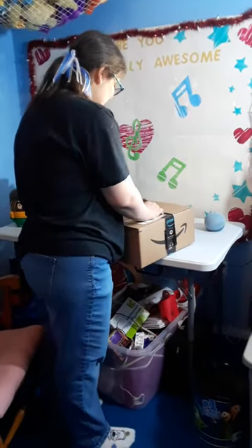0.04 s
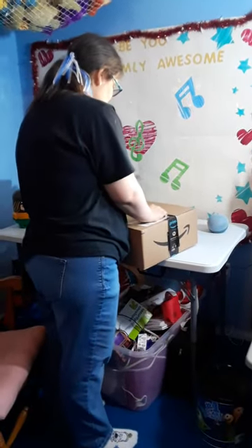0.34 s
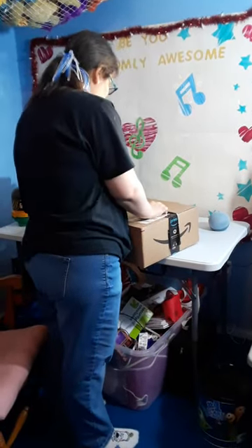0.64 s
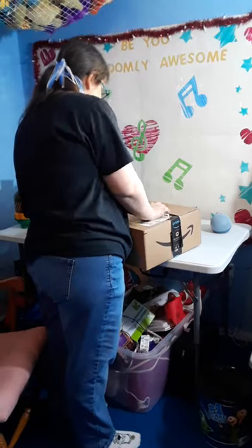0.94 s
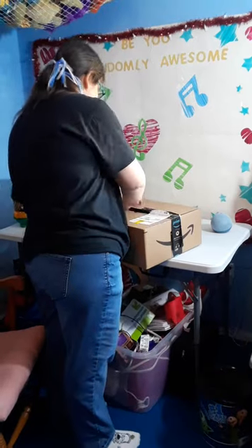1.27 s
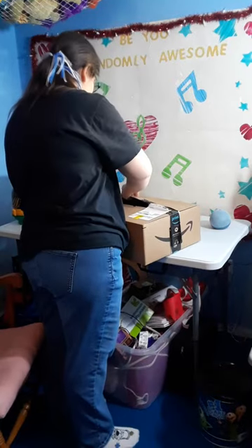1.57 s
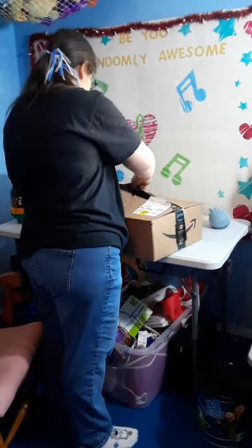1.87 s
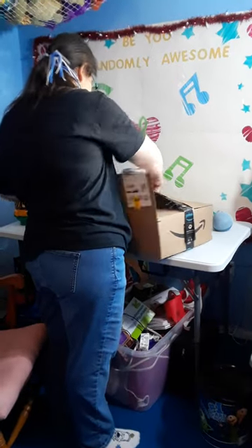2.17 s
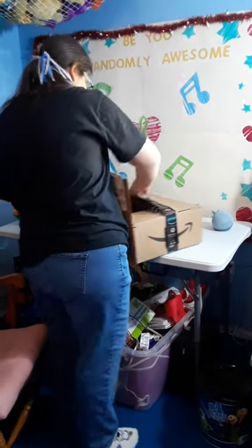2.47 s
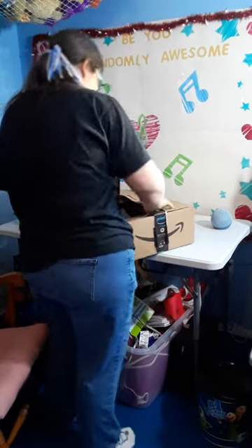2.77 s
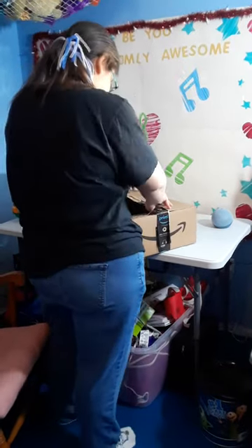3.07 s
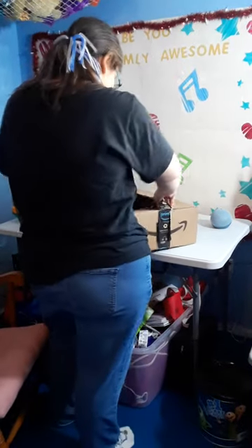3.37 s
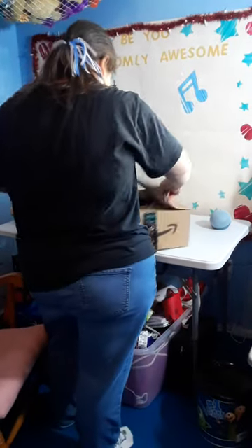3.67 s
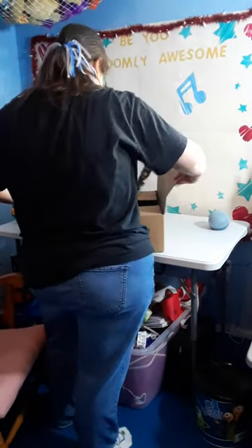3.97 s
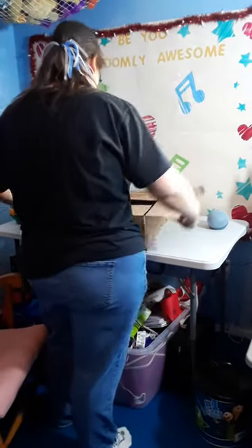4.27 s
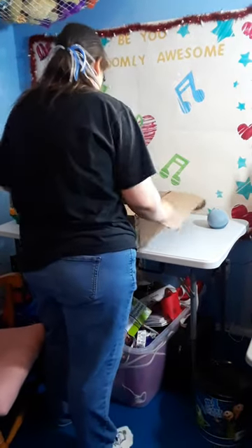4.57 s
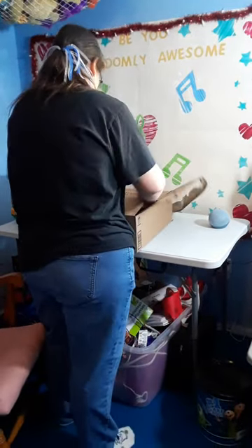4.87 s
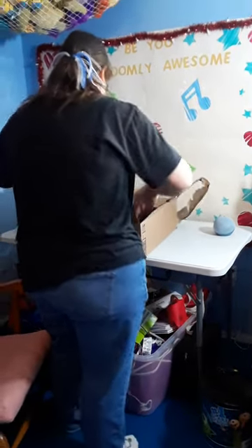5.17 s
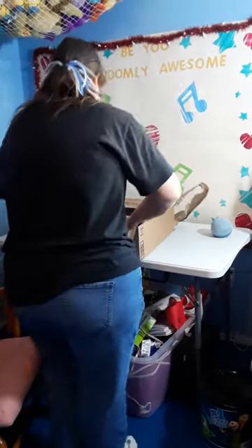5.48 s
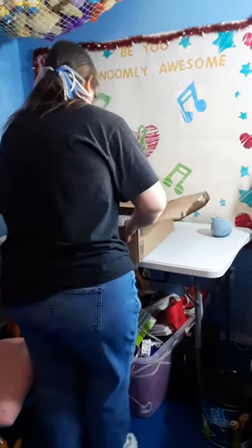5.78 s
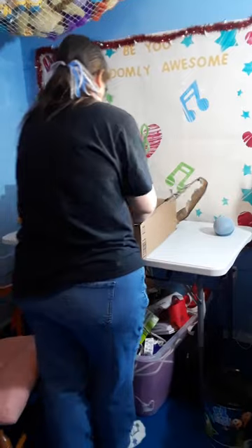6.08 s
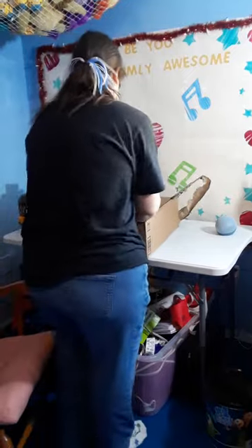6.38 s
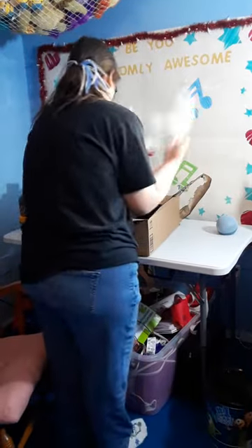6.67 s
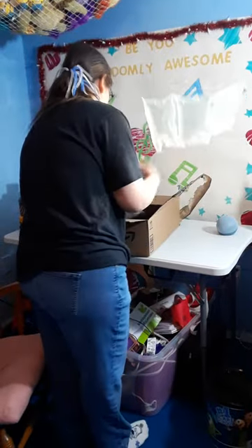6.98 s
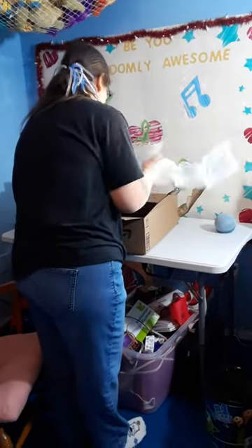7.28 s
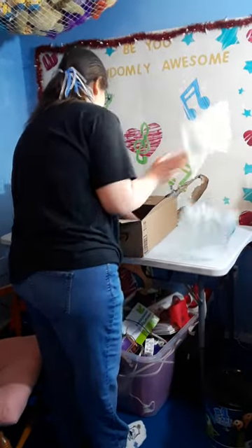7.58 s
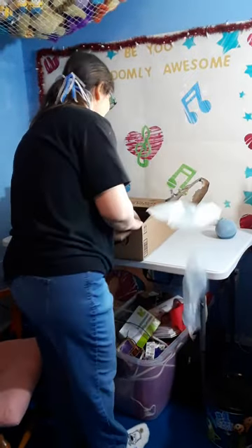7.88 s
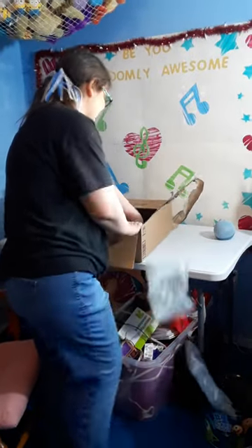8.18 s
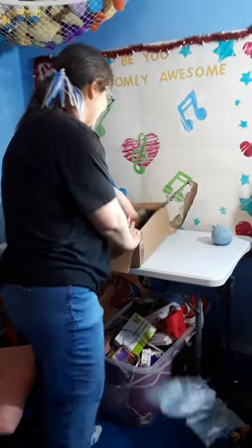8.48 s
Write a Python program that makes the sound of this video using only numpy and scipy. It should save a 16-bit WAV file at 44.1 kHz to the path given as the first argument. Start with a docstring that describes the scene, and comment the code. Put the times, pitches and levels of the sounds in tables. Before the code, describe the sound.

A cardboard box is opened by hand on a table, a few steps from the microphone in a small room. For the first second, packing tape rips off in a raspy chatter of snaps. From about 1 second the flaps scrape and rub unevenly. Sharp cracks, hollow knocks and dull bumps come between 1.6 and 2.2 seconds as the cardboard gives way, and a second loud cluster follows from 3.3 to 3.7 seconds. Softer scraping, small snaps and light bumps continue until about 6 seconds. Then plastic air pillows are dragged out and tossed aside, crinkling in irregular bursts, strongest around 6.3 and 7.2 seconds. The box knocks on the table near 7.9 seconds, and a last bump at 8.5 seconds leaves a brief low rumble. Each sound has a short room reverberation, over a faint steady hush.

```python
"""A cardboard box is opened on a folding table in a small room, a few steps from a two-port microphone.
First packing tape is ripped off, its glue yielding in a chatter of snaps. From 1 s the flaps scrape by
stick-slip friction and burst free in cracks, while knocks and bumps excite the modes of box and table.
From 6 s plastic air pillows are dragged out, crinkling, and tossed aside; a last bump at 8.5 s leaves
a low rumble. Short reverberation follows every sound, over a faint steady hush."""
import sys
import numpy as np
from scipy import signal
from scipy.fft import rfft, irfft, next_fast_len
from scipy.io import wavfile
from scipy.ndimage import uniform_filter1d

SR = 44100
rng = np.random.default_rng(int(sys.argv[2]) if len(sys.argv) > 2 else 0)


def generate_wav(sig):
    """Save sig (samples, or channels by samples) to the path in sys.argv[1] as 16-bit PCM at SR."""
    pcm = np.round(np.clip(np.atleast_2d(sig).T, -1, 1) * 32767).astype(np.int16)
    wavfile.write(sys.argv[1], SR, pcm)


N = 380583
TIME = np.arange(N) / SR
TAPS = 8192
HZ = np.fft.rfftfreq(TAPS, 1 / SR)


def amp(db):
    """Amplitude ratio of a level in decibels."""
    return 10 ** (np.asarray(db) / 20)


def unit(x):
    """Normalisation to an rms of 1."""
    return x / np.sqrt(np.mean(x ** 2) + 1e-20)


def curve(points, hz, column=1):
    """Linear interpolation of a table column over log frequency."""
    points = np.array(points)
    return np.interp(np.log(hz + 1), np.log(points[:, 0] + 1), points[:, column])


def add(mix, start_s, sound):
    """Superposition of a sound on the mix."""
    part = mix[max(0, round(start_s * SR)):][:len(sound)]
    part += sound[:len(part)]


def tint(x, gain_db):
    """Minimum-phase filter with a gain given on the HZ grid: it rings after a click, never before."""
    log_gain = np.log(amp(np.maximum(gain_db, -100)))
    mirrored = np.concatenate([log_gain, log_gain[-2:0:-1]])
    response = np.fft.ifft(np.exp(np.conj(signal.hilbert(mirrored)))).real[:TAPS // 2]
    return signal.oaconvolve(x, response)[:len(x)]


def resonance(hz, octaves):
    """Lorentzian peak of height 1 over log frequency; octaves is its half width."""
    return 1 / (1 + (np.log2((HZ + 1) / hz) / octaves) ** 2)


def band_shares(hz):
    """Complementary crossover: mid band, drumming below 700 Hz and fizz above 3.5 kHz sum to 1."""
    low = 1 / (1 + (hz / 700) ** 6)
    high = 1 - 1 / (1 + (hz / 3500) ** 8)
    return np.array([1 - low - high, low, high])


# The two ports: (frequency [Hz], left over right [dB], coherence [0-1], left phase lead [rad])
PORT_RELATIONS = [(120, -.3, .98, .05), (300, -1.8, .95, .1), (430, -7.3, .78, .5), (530, -2.8, .2, .8),
                  (650, 4.1, .25, 1.6), (780, 3.4, .4, .2), (920, 1.2, .65, .2), (1100, -3.6, .3, 2.4),
                  (1900, -1.6, .15, 1.6), (2800, -5.8, .3, 1.3), (4200, 1, .1, 0), (6300, .2, .03, 0),
                  (8800, 10, .01, 0), (13000, 5.7, 0, 0), (16000, 8, 0, 0)]
def ports(pair):
    """Partial coherence: two independent signals become alike in the bass and stay apart in the treble."""
    size = next_fast_len(pair.shape[1] + TAPS, True)
    hz = np.fft.rfftfreq(size, 1 / SR)
    left, other = rfft(pair, size)
    coherence = np.clip(curve(PORT_RELATIONS, hz, column=2), 0, .995)
    lag = np.exp(-1j * curve(PORT_RELATIONS, hz, column=3))
    right = (coherence * left + np.sqrt(1 - coherence ** 2) * other) * lag
    lean = amp(curve(PORT_RELATIONS, hz) / 2)
    return irfft(np.array([left * lean, right / lean]), size)[:, :pair.shape[1]]


# Spectrum of the room's hush: (frequency [Hz], level [dB])
HUSH_SPECTRUM = [(18, -65), (30, -39), (127, 8), (404, -1), (569, 4.5), (3060, 0), (4300, -10),
                 (7670, -11.5), (9460, -31), (13000, -17), (16000, -29)]
def hush(level_db=-50.5):
    """Stationary coloured noise forms the ambient floor of the room."""
    pair = np.array([tint(side, curve(HUSH_SPECTRUM, HZ)) for side in rng.standard_normal((2, N))])
    return amp(level_db) * unit(ports(pair))


# Reverberation time of the room: (frequency [Hz], time to fall by 60 dB [s])
ROOM_T60 = [(120, 0.62), (320, 0.19), (840, 0.34), (2200, 0.36), (6000, 0.34), (15000, 0.31)]
def room(x, direct=0.35, early=2.28, early_s=0.015, echoes_per_s=3500):
    """Convolution with direct sound, early reflections from near wall and table, and a short tail."""
    size, lead = 2 * TAPS, 48
    t = TIME[:size]
    echoes = rng.standard_normal((2, size)) * (rng.random((2, size)) < echoes_per_s / SR) * (t > .001)
    hz, age, spectra = signal.stft(echoes * (1 + early * np.exp(-t / early_s)), SR, nperseg=256)
    decay = amp(-60 * age / curve(ROOM_T60, hz)[:, None])
    tail = signal.istft(spectra * decay, SR)[1][:, :size]
    response = np.pad(tail / np.linalg.norm(tail, axis=1, keepdims=True), ((0, 0), (lead, 0)))
    response[[0, 1], [lead, lead + 19]] += direct  # reaches the left port first
    response = ports(response)
    # the room spreads the sound in time but keeps its broad colour
    power = abs(rfft(response.mean(0), 4 * TAPS)) ** 2
    colour_db = 10 * np.log10(uniform_filter1d(power, 60)[::4] + 1e-9)
    return np.array([signal.oaconvolve(x, tint(side, -colour_db))[lead:lead + N] for side in response])


def moving_paths(x, count=4, cycle_s=.13):
    """Multipath propagation: as hands and flaps move, the sound crossfades between paths in the room."""
    turn = TIME / cycle_s * count
    distances = [abs((turn - k) % count - count / 2) for k in range(count)]
    shares = [np.cos(np.pi / 2 * np.minimum(distance, 1)) for distance in distances]
    return amp(-1.55) * sum(room(x * share) for share in shares)


# Modes of the box on its table: (frequency [Hz], bandwidth [Hz], lift [dB])
BOX_MODES = [(79, 21, 8.5), (141.5, 21, 10), (209.7, 17, 5.5), (316, 47, 6), (412.5, 53, 6.5),
             (534, 27, 4.5), (654, 23, 5), (773, 48, 2.5), (910, 44, 3.5), (1190, 67, 3.5), (1444, 67, 4)]
def box_db():
    """Modal response: the box lifts any excitation near its natural frequencies."""
    return sum(db / (1 + (2 * (HZ - hz) / width) ** 2) for hz, width, db in BOX_MODES)


# Dull bumps of the box on the table: (time [s], level [dB], pitch [Hz])
TABLE_BUMPS = [(1.689, -21.5, 327), (2.039, -29, 240), (2.05, -32.5, 95), (2.056, -31.5, 188),
               (3.349, -26, 260), (3.356, -33, 90), (3.438, -24.5, 258), (3.83, -41.5, 200),
               (4.113, -34, 181), (4.285, -46, 219), (4.983, -45, 220), (5.2, -43.5, 136),
               (5.414, -40, 171), (5.444, -39.5, 210), (5.828, -37, 185), (5.855, -42, 167),
               (6.03, -38.5, 296), (6.114, -43, 232), (6.642, -46.5, 315), (7.675, -41.5, 270),
               (7.851, -34.5, 182), (7.877, -34.5, 214), (7.931, -40, 278), (8.495, -28.5, 230)]
def bumps(fade_s=0.0086, octaves=0.56, rms_span_s=0.034, weight_db=-8, heavy_hz=150, cutoff_hz=66):
    """A soft impact excites the low modes near its pitch; the duller it is, the more the table shakes."""
    out = np.zeros(N)
    for time, db, hz in TABLE_BUMPS:
        panel = 1 / (1 + (np.log2((HZ + 1) / hz) / octaves) ** 6)
        table = (amp(weight_db) * (heavy_hz / hz) ** 2) ** 2 / (1 + (HZ / hz) ** 6)
        radiated = (panel + table) / (1 + (cutoff_hz / (HZ + 1)) ** 18)
        push = rng.standard_normal(TAPS) * np.exp(-TIME[:TAPS] / fade_s)
        sound = tint(push, 10 * np.log10(radiated) + box_db())
        add(out, time, amp(db) * sound / np.linalg.norm(sound) * np.sqrt(rms_span_s * SR))
    return out


# Spectrum of struck cardboard: (frequency [Hz], level [dB])
BOARD_SPECTRUM = [(24, -112), (40, -65), (81, -15), (215, 2.5), (345, -4), (402, 0), (479, -2), (663, -1),
                  (1180, -5.5), (2910, -8), (4030, -25), (7360, -29), (9690, -40.5), (13400, -37),
                  (16000, -47)]
def panel_db(hz, lift_db, octaves):
    """Filters in cascade add in decibels: the board, the box modes and one panel's resonance."""
    return curve(BOARD_SPECTRUM, HZ) + box_db() + lift_db * resonance(hz, octaves)


# Hollow knocks: (time [s], level [dB], pitch [Hz])
PANEL_KNOCKS = [(1.966, -37, 1010), (2.037, -17.5, 446), (2.166, -31.5, 890), (3.345, -22.5, 440),
                (3.979, -39, 2110), (4.988, -41.5, 1590), (7.577, -44.5, 1470), (7.848, -35, 348)]
def knocks(fade_s=.005, rms_span_s=0.025):
    """Impulsive excitation: a brief blow rings one panel near its natural frequency."""
    out = np.zeros(N)
    for time, db, hz in PANEL_KNOCKS:
        push = rng.standard_normal(TAPS) * np.exp(-TIME[:TAPS] / fade_s)
        sound = tint(push, panel_db(hz, lift_db=13, octaves=0.35))
        add(out, time, amp(db) * sound / np.linalg.norm(sound) * np.sqrt(rms_span_s * SR))
    return out


def slips(size, per_s, spread_db, hiss):
    """Poisson process: clicks of very unequal strength, as in stick-slip, over a smooth hiss."""
    strength = amp(spread_db * np.minimum(rng.exponential(1, size), 4))
    clicks = strength * rng.choice([-1, 1], size) * (rng.random(size) < per_s / SR)
    return unit(unit(clicks) + hiss * rng.standard_normal(size))


# Pitched rasps, and the low rumble after the last bump:
# (time of peak [s], length [s], pitch [Hz], level [dB])
RASPS_AND_RUMBLE = [(0.206, 0.069, 2720, -24), (.265, 0.16, 1360, -32), (0.589, .1, 2720, -28.5),
                    (.852, 0.051, 3720, -30.5), (2.177, .06, 825, -41), (2.769, 0.093, 960, -43),
                    (6.3, 0.13, 950, -39), (6.899, 0.043, 1310, -34), (7.501, .25, 1500, -56),
                    (8.512, 0.16, 1300, -42.5), (8.563, 0.22, 218, -41)]
def rasps_and_rumble(octaves=0.25):
    """Forced resonance: grains swell and fade at one pitch, as a strip or panel rasps or a bump rumbles."""
    out, centre_s = np.zeros(N), TAPS / SR
    for time, length, hz, db in RASPS_AND_RUMBLE:
        grains = slips(2 * TAPS, per_s=830, spread_db=3, hiss=0.092)
        ringing = tint(grains, 20 * np.log10(resonance(hz, octaves)))
        swell = np.exp(-(2 * (TIME[:2 * TAPS] - centre_s) / length) ** 2)
        add(out, time - centre_s, amp(db) * unit(ringing) * swell)
    return out


def effort(strokes, rest_db, sag_db_per_s=18.5, release_s=0.014):
    """Incoherent strokes add in power, giving three band gains; drumming and fizz are relative to mid."""
    clock = TIME[::16]
    touching = (clock > strokes[0][0]) * (clock < strokes[-1][0])  # the hand rests between strokes
    power = np.zeros((3, len(clock))) + amp(rest_db) ** 2 * touching
    for start, rise, hold, mid, drum, fizz in strokes:
        held = np.maximum(clock - start - rise, 0)
        attack = np.clip((clock - start) / rise, 0, 1)
        release = np.exp(-np.maximum(held - hold, 0) / release_s)
        envelope = attack * amp(-sag_db_per_s * held) * release
        power += np.outer(amp([mid, mid + drum, mid + fizz]), envelope) ** 2
    return [np.interp(TIME, clock, gain) for gain in np.sqrt(power)]


def friction(gains, spectrum, grains, box_share, judder_db, judder_hz):
    """Source and filter: the hand's uneven catching modulates grains that material and box then colour."""
    catches = np.interp(TIME * judder_hz, np.arange(N // 16), rng.standard_normal(N // 16))
    rubbing = tint(grains * amp(judder_db * catches), curve(spectrum, HZ) + box_share * box_db())
    size = next_fast_len(N, True)
    bands = irfft(rfft(rubbing, size) * band_shares(np.fft.rfftfreq(size, 1 / SR)), size)[:, :N]
    return sum(unit(band) * gain for band, gain in zip(bands, gains))


# Spectrum of rubbed cardboard: (frequency [Hz], level [dB])
FLAP_SPECTRUM = [(24, -78), (40, -46), (60, -27.5), (137, -11.5), (262, -11), (402, -12), (680, -8),
                 (918, -4.5), (990, -4), (2570, 0), (4130, -5), (7540, -6), (9450, -14.5), (12800, -9.5),
                 (16000, -21)]
# Slides over the board: (start [s], rise [s], hold [s], mid level [dB], drumming [dB], fizz [dB])
FLAP_STROKES = [(0.963, 0.081, 0.024, -47.5, 0, -2), (1.094, 0.018, 0.033, -42.5, -3.5, -4),
                (1.221, 0.047, 0.032, -54.5, 7.5, -4), (1.373, 0.12, 0.069, -53.5, 8, -5),
                (1.55, 0.12, 0.057, -47.5, -7, 1.5), (1.796, 0.023, 0.15, -44.5, 2, -6),
                (2.149, 0.13, 0.066, -43.5, -12, -5), (2.325, 0.15, 0.23, -45.0, -2.5, -3),
                (2.634, 0.078, 0.092, -42, -8, -10.5), (2.789, 0.045, 0.24, -53, -1.5, 4.5),
                (2.944, 0.043, 0.097, -47.5, -3, -4.5), (3.258, 0.032, 0.26, -45, -1, -3.5),
                (3.52, 0.062, 0.063, -43.5, -2, -3.5), (3.772, 0.023, 0.16, -42.5, -3, -7),
                (3.969, 0.13, 0.11, -42, -7, -8.5), (4.194, 0.039, 0.15, -48.0, -4, -7.5),
                (4.376, 0.03, 0.18, -43, -8, -8), (4.478, 0.13, 0.18, -45.5, -11, 2.5),
                (4.759, 0.067, 0.15, -49.5, -6.5, -4), (5.094, 0.043, 0.13, -52, -1, -5.5),
                (5.237, 0.2, 0.1, -43.0, -6, -3.5), (5.666, 0.066, 0.069, -48.5, 0, -6.0),
                (5.817, 0.013, 0.07, -48.5, 1, -8), (5.914, 0.029, 0.11, -52, -7, -3)]
def flaps():
    """Dry sliding friction: hands and flaps scrape over cardboard, with as much hiss as clicks."""
    gains = effort(FLAP_STROKES, rest_db=-71)
    grains = slips(N, per_s=2000, spread_db=5.5, hiss=0.99)
    return friction(gains, FLAP_SPECTRUM, grains, box_share=1.0, judder_db=3.0, judder_hz=59.86)


# Spectrum of plastic film: (frequency [Hz], level [dB])
FILM_SPECTRUM = [(24, -102), (40, -46), (140, -12.5), (176, -39), (204, -12.5), (256, -10.5), (305, -5),
                 (570, -11), (873, 0.5), (2630, 3.5), (4130, 1.5), (7540, 1.5), (9690, -9), (12800, -6),
                 (16000, -17.5)]
# Grips, drags and tosses: (start [s], rise [s], hold [s], mid level [dB], drumming [dB], fizz [dB])
PILLOW_STROKES = [(6.151, 0.019, 0.053, -42.5, -7, -4.5), (6.208, 0.084, 0.052, -31.5, -4.5, -2.5),
                  (6.343, 0.038, 0.083, -33, -3, -3.5), (6.517, 0.042, 0.024, -44, -10, -2.5),
                  (6.602, 0.076, 0.085, -45, -15, -2.5), (6.789, 0.11, 0.084, -38.0, -5, -2.5),
                  (6.882, 0.0055, 0.025, -33.5, -4, -7.0), (7.048, 0.047, 0.045, -47.5, -11.5, -1.5),
                  (7.137, 0.0096, 0.135, -30, -6.5, -4), (7.327, 0.036, 0.081, -40.5, -14.5, -3.5),
                  (7.459, 0.06, 0.035, -47.0, -10, -7.5), (7.612, 0.052, 0.082, -42.0, -9.5, -5),
                  (7.822, 0.079, 0.065, -43.5, -1, -5.5), (8.14, 0.024, 0.062, -41.5, -6.5, -4.5),
                  (8.322, 0.1, 0.1, -42, -2, -11), (8.43, 0.065, 0.14, -38, 4.5, -9)]
def pillows():
    """Friction on a membrane: thin inflated film rubs along the box walls and crinkles."""
    gains = effort(PILLOW_STROKES, rest_db=-67)
    grains = slips(N, per_s=1900, spread_db=6, hiss=0.48)
    return friction(gains, FILM_SPECTRUM, grains, box_share=.45, judder_db=1.1, judder_hz=140)


# Spectrum of peeling tape: (frequency [Hz], level [dB])
TAPE_SPECTRUM = [(24, -71), (40, -39), (63, -23), (99, -3.5), (171, -9), (297, -1), (354, -8.5), (412, -1),
                 (479, -5), (3060, -4), (4130, -9.5), (7730, -12), (9690, -23.5), (12800, -19),
                 (16000, -32)]
# Tugs on the tape: (start [s], rise [s], hold [s], mid level [dB], drumming [dB], fizz [dB])
TAPE_STROKES = [(0.033, 0.0023, 0.022, -40, -19, -7), (0.067, 0.0039, 0.019, -25.5, -6, -5.5),
                (0.175, 0.0061, 0.1, -23, -6, -2), (0.28, 0.021, 0.36, -29.5, -4, -4),
                (0.372, 0.002, 0.0033, -24.5, -15, 1.5), (0.525, 0.034, 0.016, -27.5, -1.5, -1.5),
                (0.722, 0.004, 0.03, -36.5, -5.5, -6), (0.753, 0.048, 0.065, -30.5, -7.5, -3)]
def tape():
    """Stick-slip peeling: the glue lets go in a fast chatter of snaps."""
    gains = effort(TAPE_STROKES, rest_db=-47.5)
    grains = slips(N, per_s=1600, spread_db=4.5, hiss=0.21)
    return friction(gains, TAPE_SPECTRUM, grains, box_share=.5, judder_db=1.8, judder_hz=300)


# Tape and board giving way:
# (time [s], mid level [dB], drumming re mid [dB], fizz re mid [dB], decay time [s], panel pitch [Hz])
FRACTURES = [(1.201, -44.5, -6.5, 0, .006, 2470), (1.45, -47.5, 4, 3, 0.0085, 477),
             (1.496, -41.5, 0, -6, 0.0058, 1070), (1.631, -30.5, 2.5, -7.5, 0.027, 1040),
             (1.686, -21, 4, -7.5, 0.01, 660), (1.729, -28.5, -4.5, -2.5, 0.011, 1360),
             (1.776, -28, -6, -2, 0.016, 1630), (1.834, -32.5, -1.5, -4, 0.017, 490),
             (2.0092, -26, -2.5, -0.5, 0.0046, 800), (2.026, -18, 2.5, -4, .007, 1210),
             (2.156, -32.5, -10, -2.5, 0.024, 830), (2.962, -42.5, -1, 6, 0.032, 4100),
             (3.297, -47.5, -18, 5, 0.0049, 460), (3.37, -33.5, -1, -7, 0.0068, 530),
             (3.436, -28, -18, 3, 0.027, 347), (3.4732, -20.5, -5.5, 1.5, .007, 2940),
             (3.6614, -18.5, -2, -4, 0.025, 830), (4.075, -44, -10, 3, 0.022, 1450),
             (4.111, -33, -8, -3, 0.0086, 570), (4.17, -42, -3, 4, .01, 513),
             (4.408, -42.5, -17, 1, 0.01, 2920), (5.578, -36, -1.5, -4.5, 0.011, 1840),
             (5.843, -55.5, -3, 10.5, .002, 4000), (6.036, -36.5, -7, -8, .058, 960),
             (7.633, -41, -12, 9.5, 0.016, 3000), (7.846, -46.5, -1, -1, 0.014, 910),
             (8.157, -43, -11, 7.5, 0.031, 343), (8.493, -34, 2, -19, 0.016, 1394)]
def cracks(rms_span_s=0.04, snap=0.3):
    """Fracture: a first snap sets off a short avalanche of breaking fibres that drums on one panel."""
    out, shares = np.zeros(N), band_shares(HZ)
    for time, mid, drum, fizz, fade_s, panel_hz in FRACTURES:
        decay = np.exp(-(TIME[:TAPS] / fade_s) ** 1.22)
        burst = slips(TAPS, per_s=1600, spread_db=4.0, hiss=0.23) * decay
        burst[0] += snap * np.linalg.norm(burst)
        colour_db = panel_db(panel_hz, lift_db=8, octaves=0.18)
        band_energy = 2 / TAPS * shares @ abs(rfft(burst) * amp(colour_db)) ** 2
        band_db = 10 * np.log10(band_energy / (rms_span_s * SR))
        gain_db = np.array([mid, mid + drum, mid + fizz]) - band_db
        add(out, time, tint(burst, colour_db + gain_db @ shares))
    return out


def scene():
    """Superposition: all handling happens at the box and reaches the microphone through the same room."""
    handling = tape() + flaps() + pillows() + cracks() + knocks() + rasps_and_rumble() + bumps()
    return moving_paths(handling) + hush()


# Response of the microphone ducts, a notch in a rising treble: (frequency [Hz], gain [dB])
DUCT_RESPONSE = [(6500, .5), (8000, 3.5), (9200, -3), (10500, -1), (12500, 2), (14500, 5), (16000, 9)]
def record(dry, ceiling=0.67, edge_hz=16200):
    """Transduction: duct colour, soft saturation on the hardest cracks, then the band limit."""
    coloured = np.array([tint(side, curve(DUCT_RESPONSE, HZ)) for side in dry])
    saturated = coloured / (1 + (coloured / ceiling) ** 4) ** .25
    lowpass = signal.firwin(511, edge_hz, window=("kaiser", 9), fs=SR)
    return signal.oaconvolve(saturated, lowpass[None], "same")


dry = scene()
out = record(dry)
generate_wav(out)
```